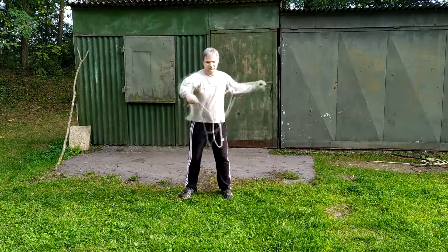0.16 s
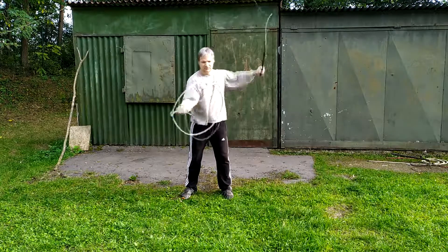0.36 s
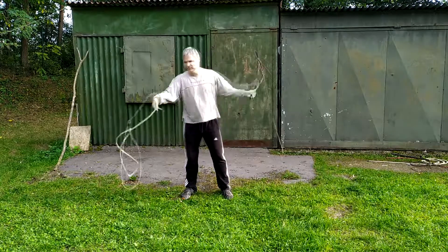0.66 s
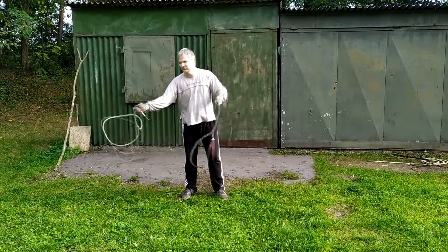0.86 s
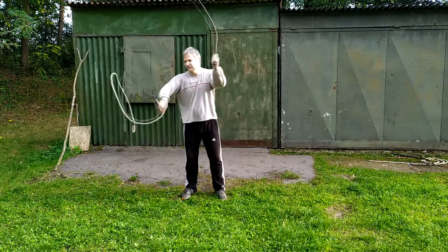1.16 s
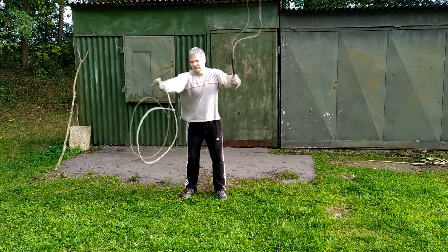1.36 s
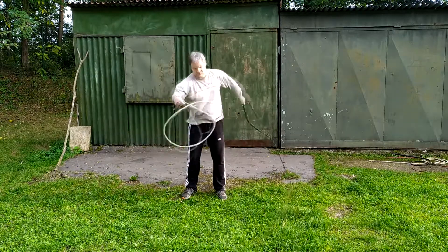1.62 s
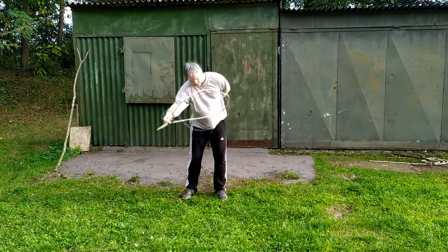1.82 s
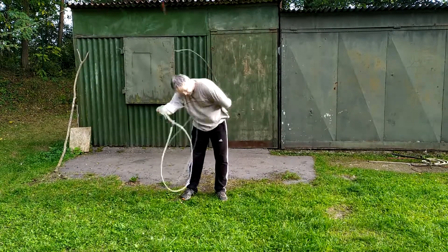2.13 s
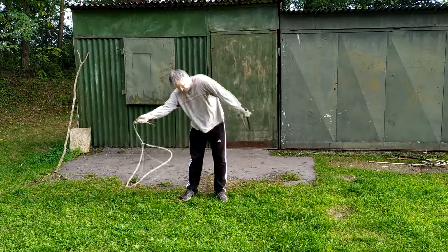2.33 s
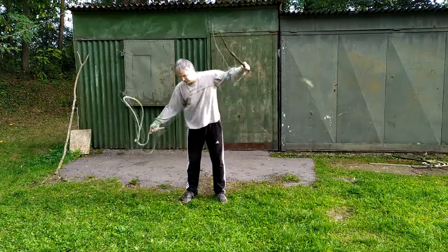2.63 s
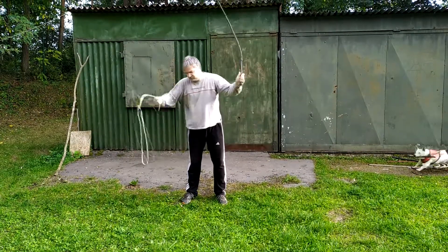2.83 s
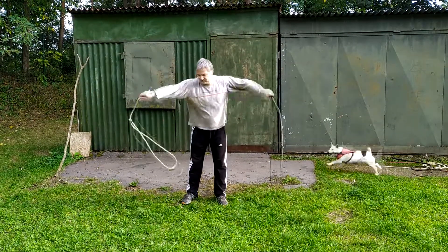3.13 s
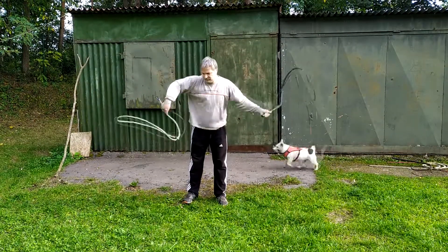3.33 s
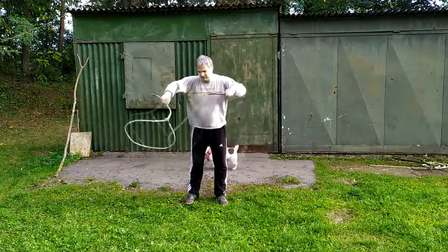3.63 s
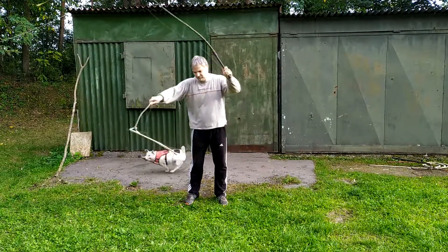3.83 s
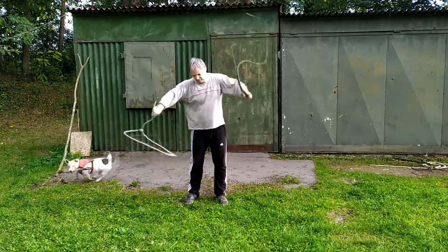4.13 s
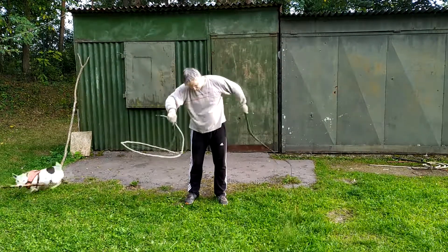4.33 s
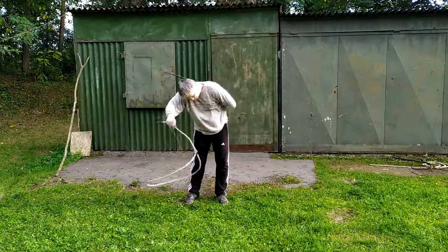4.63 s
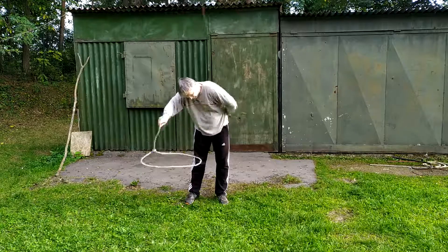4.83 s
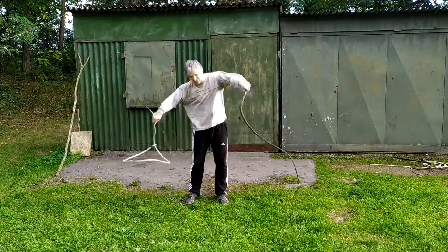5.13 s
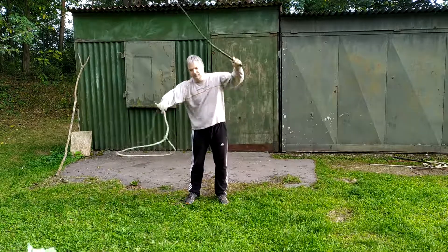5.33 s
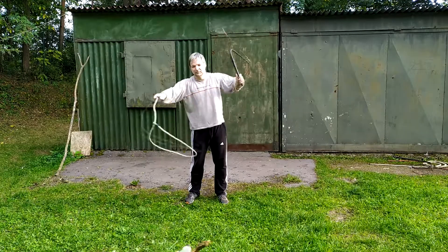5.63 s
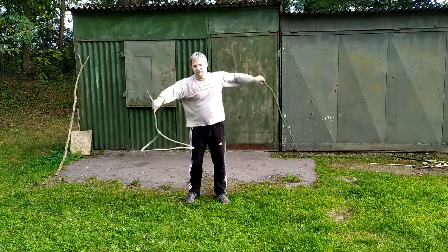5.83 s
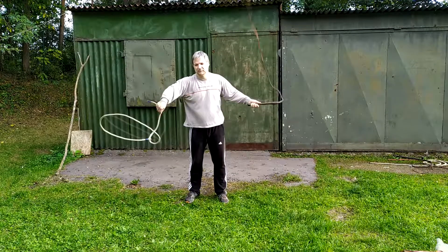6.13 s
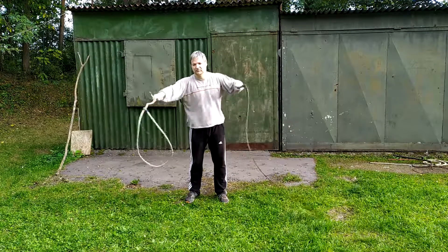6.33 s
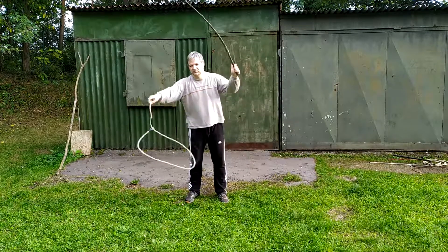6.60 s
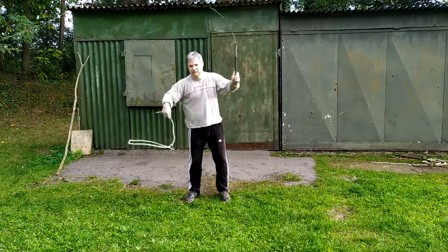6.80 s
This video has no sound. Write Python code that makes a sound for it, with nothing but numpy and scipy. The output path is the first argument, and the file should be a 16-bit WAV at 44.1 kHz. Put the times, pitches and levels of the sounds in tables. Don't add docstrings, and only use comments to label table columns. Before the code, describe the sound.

A bullwhip is swung on a lawn by a metal shed among trees, heard in close stereo. At 0 s a violent crack, the strongest, bursts in already at full force, overloading the microphones with a thump and momentary deafness; a shed echo and bright leafy tail follow. Soft rushes, a falling whistle, then a cluster of hard ticks and dull grass slaps come around 0.75-0.92 s. Cracks return at 1.54, a tight double at 2.44, then 3.17 and 3.43, a strong one at 4.28, another tight double at 5.06, and 5.84 and 6.14 s. Short rising swishes with tip hiss precede many. Each crack is instant, broadband and only milliseconds long, with diffuse tree echoes decaying behind. Fuzzy whistles and low slaps fill the gaps, notably near 2.0, 2.6, 3.65, 4.5 and 5.2 s. Faint breeze, rumble and leaf hiss continue to about 7 s.

```python
import sys
import numpy as np
from scipy import signal
from scipy.fft import rfft, irfft
from scipy.io import wavfile
from scipy.ndimage import uniform_filter1d

SR = 44100
rng = np.random.default_rng(int(sys.argv[2]) if len(sys.argv) > 2 else 0)


def pcm_store(signal):
    levels = np.round(np.clip(np.atleast_2d(signal), -1, 1) * 32767)
    wavfile.write(sys.argv[1], SR, levels.astype(np.int16).T)


def ratio(d):
    e = np.asarray(d, float) / 20
    return 10 ** e


N = 306926

# t/s, shock level/dB, shock length/ms, left-right level/dB, shed echo delay/ms
CRACKS = [(-.001, 15.5, 3, 3, 28), (1.5428, -2, 7.6, 7, 28), (2.4341, -16.5, 10, 0, 3.4),
          (2.4421, -4, 5.6, 0, 26), (3.1699, -1, 4.4, 9, 21.2), (3.428, -4.5, 6.5, 0.5, 23),
          (4.2809, 4, 3.8, 0.5, 32), (5.0609, -3.5, 2, 2.5, 25), (5.0701, -3.5, 7, 1.5, 19),
          (5.842, -1, 4, -4, 24), (6.14, -4, 8.1, 2.5, 25)]
# shed level/dB, near trees level/dB, far trees level/dB, brightness/(dB per octave)
RETURNS = [(-14.5, -7.5, -22.5, -3), (-17.5, -7.5, -28, -2.5), (-15.5, -36, -49, -1),
           (-31, -11.5, -25.5, -0.36), (-15, -11, -28.5, -1.75), (-18, -15, -24.5, -1.56),
           (-16, -7.5, -25, -3), (-35, -10.5, -33.5, -0.5), (-42.5, -9.5, -23.5, -1),
           (-18, -10.5, -26.5, -1.53), (-25.5, -18.5, -22.5, 0)]


def evened(x):
    return x / np.sqrt(np.mean(x ** 2) + 1e-20)


def read(points, hz):
    f, value = np.transpose(points)
    return np.interp(np.log(hz + 1), np.log(f + 1), value)


def add(mix, s, sound, pan_db=0.):
    at = round(s * SR)
    sound = (sound * ratio(np.array([[.5], [-.5]]) * pan_db))[:, max(-at, 0):]
    part = mix[:, max(at, 0):][:, :sound.shape[1]]
    part += sound[:, :part.shape[1]]


def resonate(x, hz, width):
    turn = np.exp(2j * np.pi * np.cumsum(hz) / SR)
    r = np.exp(-np.pi * width / SR)
    return 2 * (turn * signal.lfilter([(1 - r) ** 2], [1, -2 * r, r * r], x / turn)).real


def smoothed(x, bins, frames):
    return evened(uniform_filter1d(uniform_filter1d(x, size=bins, axis=0), size=frames, axis=1))


def air():
    # f/Hz, level/(dB per Hz)
    spectrum = [(18, -38), (30, -3), (79, -3), (138, -15.5), (303, -10.5), (554, -18.5), (632, -20.5),
                (1100, -18.5), (2350, -24), (5450, -23.5), (9970, -17.5), (16000, -24.5)]
    # f/Hz, left-right likeness/1
    likeness = [(60, 0.9), (240, 1), (950, 0.77), (3770, -0.23), (15000, -0.38)]
    # t/s, breeze on the lawn level/dB, wind in the tree tops level/dB
    breeze = [(0, -4.5, 1.5), (.5, -1.5, 0.5), (.9, 3, 5.5), (1.26, -3.5, 3.5), (1.5, 3, 1),
              (2.001, 3, -3.5), (2.3, -1.5, -3.5), (2.45, 8, 1), (2.8, -5, -4.5), (3.1, 4, -3), (3.7, 6, 3),
              (3.86, -4, 1), (4.5, 3, 2), (4.901, 2.5, -2.5), (5.5, 1, 0.5), (5.8, 6.5, 2.5),
              (6.55, 0.5, 8), (6.96, 1.5, 6)]
    per_wind = [0.081, 0.042, .25, 0.98]
    # gain per dB of lawn breeze, gain for a full stir/dB, base level/dB
    per_breeze, per_stir_db, base_db = [.7, 1.2, 0.4, 0], [7, 7, 0.5, 6], [2.5, 1.5, 2, -4.5]
    level_db, patchy_db, stir_s = -55, 3.5, 0.8

    frames, hz = N // 256 + 5, np.fft.rfftfreq(1024, 1 / SR)[:, None]
    a, b, c, d, patches = rng.standard_normal((frames, 513, 5)).T
    patches = smoothed(patches, 10, 10)
    t = (np.arange(frames) * 256 - 512) / SR

    age = t - np.transpose(CRACKS)[:1].T
    stir = (np.exp(-np.maximum(age, 0) / stir_s) * (age > 0)).max(axis=0)
    s, lawn_db, tops_db = np.transpose(breeze)
    wind_db = np.outer(per_breeze, np.interp(t, s, lawn_db))
    wind_db += np.outer(per_wind, np.interp(t, s, tops_db))
    rumble_db, grass_db, leaf_db, fizz_db = wind_db + np.outer(per_stir_db, stir) + np.c_[base_db]

    low = 1 / (1 + (hz / 170) ** 4)
    high = 1 / (1 + (1500 / (hz + 1)) ** 2)
    swell_db = low * rumble_db + (1 - low - high) * grass_db + high * leaf_db
    swell_db += fizz_db / (1 + (9300 / (hz + 1)) ** 10)

    same = np.clip(read(likeness, hz), -1, 1)
    left = a + 1j * b
    right = same * left + np.sqrt(1 - same ** 2) * (c + 1j * d)
    patch_db = patchy_db * (1 - low - 0.2 * high) * patches
    z = np.array([left, right]) * evened(ratio(read(spectrum, hz))) * ratio(swell_db + patch_db)
    return ratio(level_db + 27.5) * signal.istft(z, nperseg=1024, noverlap=768)[1][:, :N] / 1024


def slaps():
    # t/s, peak level/dB, f/Hz, t60/s, left-right level/dB
    blows = [(0.265, -39.5, 150, 0.045, -3), (0.587, -42, 746, 0.051, 0.0), (0.8078, -30, 330, 0.029, -1),
             (0.8182, -36, 783, 0.031, -1), (0.896, -40.5, 770, 0.14, -2), (0.924, -35.5, 328, 0.039, -3),
             (1.814, -37.5, 1090, 0.19, 0), (2.021, -40.5, 854, 0.042, 6.5), (2.429, -24.5, 158, 0.024, 0),
             (2.437, -49, 353, 0.031, -1), (2.599, -28, 177, 0.033, -2), (3.653, -29.5, 880, 0.062, 1),
             (3.66, -25.5, 173, 0.011, -1), (3.699, -35.5, 1260, 0.034, 1.5), (4.505, -38, 282, 0.052, 2),
             (4.552, -35, 1170, 0.24, 0.0), (4.599, -45, 339, 0.14, -3), (5.217, -33, 176, 0.076, -2),
             (5.578, -51, 117.7, 0.056, -18), (6.629, -40.5, 170, 0.047, 1)]
    out, t = np.zeros((2, N)), np.arange(4000) / SR
    for s, db, hz, t60, pan_db in blows:
        shared, *own = rng.standard_normal((3, 4000))
        puff = evened(resonate(shared + 0.96 * np.array(own), hz + 0 * t, 0.65 * hz)) + 0.1 * shared
        decay = .7 * ratio(-60 * t / t60) + .5 * np.exp(-t / 0.0057)
        blow = (1 - np.exp(-t / 0.003)) * decay * puff
        add(out, s, ratio(db - 2.5) * blow / abs(blow).max(), pan_db)
    return out


def ticks():
    # t/s, peak level/dB, f/Hz, left-right level/dB
    contacts = [(0.743, -26, 4740, 3), (0.7576, -40, 3440, 0), (0.8084, -26.5, 945, 5),
                (0.8197, -32, 1900, 1), (0.832, -27.5, 9000, -1), (0.8372, -31, 3530, 3.5),
                (0.848, -33, 8900, 6), (0.8995, -24.5, 1520, 1), (0.9172, -34.5, 5300, 5),
                (0.9214, -47, 2500, 8.5), (0.8537, -40, 6960, 3), (5.812, -51, 3600, -4)]
    out, t = np.zeros((2, N)), np.arange(4000) / SR
    for s, db, hz, pan_db in contacts:
        shared, *own = rng.standard_normal((3, 4000))
        snap = evened(resonate(shared + 0.27 * np.array(own), hz + 0 * t, 0.6 * hz)) + .15 * shared
        snap = 0.87 * snap + 1.07 * np.sin(2 * np.pi * hz * t) * np.exp(-t / 0.0018)
        decay = np.exp(-t / 0.00048) + 0.16 * np.exp(-t / 0.0045)
        add(out, s, ratio(db + 0.5) * snap * decay, pan_db)
    return out


def sings():
    # t/s, length/s, low f/Hz, high-to-low ratio/1, level/dB
    pairs = [
        (1.173, 0.12, 808, 1.2, -68.5),
        (2.082, 0.23, 605, 1.528, -70),
    ]
    width, sag_per_s = 0.023, .4
    return [(s, d, k * hz, k * hz * (1 - sag_per_s * 0.011 / d), width, db)
            for s, d, hz, up, db in pairs for k in (1, up)]


def whistles():
    # t/s, length/s, start f/Hz, end f/Hz, level/dB
    passes = [
        (0.547, .119, 905, 600, -55.5),
        (2.018, 0.065, 950, 840, -49.5),
        (2.596, 0.095, 837, 790, -52.5),
        (2.671, 0.079, 690, 753, -51.5),
        (3.595, 0.081, 295, 910, -56.5),
        (4.133, 0.053, 395, 507, -59),
        (4.607, 0.082, 760, 900, -51.5),
        (5.261, 0.073, 660, 476, -53.5),
        (5.314, 0.048, 690, 654, -50.5),
        (5.758, .015, 2240, 2170, -51),
    ]
    return [(s, d, hz0, hz1, 0.12, db) for s, d, hz0, hz1, db in passes]


def rushes():
    # t/s, length/s, f/Hz, level/dB
    loops = [(0.292, 0.079, 970, -47.5), (0.56, 0.063, 1740, -53.5), (2.008, .047, 4530, -51.5),
             (3.085, .092, 9300, -50), (3.329, 0.032, 245, -50), (3.996, 0.066, 1760, -55.5),
             (3.998, .072, 6070, -55.5), (4.797, 0.013, 1500, -57), (4.863, 0.049, 3750, -57),
             (5.208, 0.095, 308, -50.5), (5.639, 0.04, 2000, -55), (5.736, 0.046, 2750, -46),
             (6.303, 0.25, 1070, -59), (6.726, .026, 9100, -54), (0.797, 0.025, 5860, -47.5),
             (0.812, 0.1, 7000, -59), (0.901, 0.052, 5000, -60.5), (6.934, 0.047, 5000, -57.5)]
    width, sag = .9, 0.97
    return [(s, d, hz / np.sqrt(sag), hz * np.sqrt(sag), width, db) for s, d, hz, db in loops]


def run_ups():
    # end t/s, length/s, start f/Hz, top f/Hz, whistle level/dB
    races = [
        (1.554, 0.18, 330, 590, -64),
        (2.449, 0.046, 703, 1026, -39),
        (3.171, 0.059, 330, 910, -65),
        (4.284, .1, 602, 990, -58),
        (5.063, 0.052, 400, 1420, -45.5),
        (5.852, .04, 500, 900, -60),
        (6.143, 0.047, 850, 1140, -53),
    ]
    tip_hiss_db = [
        -51.5,
        -47.5,
        -60,
        -52,
        -54,
        -60,
        -58,
    ]
    width, octave_db, hiss_s, hiss_early_s = .25, -9, .045, .006
    rows = [(end - d, d, hz0, hz1, width, db) for end, d, hz0, hz1, db in races]
    rows += [(s, d, 2 * hz0, 2 * hz1, share, db + octave_db) for s, d, hz0, hz1, share, db in rows]
    rows += [(end - hiss_s - hiss_early_s, hiss_s, 3000, 5000, 1, db)
             for (end, *_), db in zip(races, tip_hiss_db)]
    return rows


def swishes():
    out = np.zeros((2, N))
    for start, length, hz0, hz1, share, db in run_ups() + rushes() + whistles() + sings():
        u = np.arange(0, 1, 1 / (SR * length))
        shared, flutter, *own = rng.standard_normal((4, SR // 4))[:, :len(u)]
        pitch = hz0 * (hz1 / hz0) ** u
        whistle = resonate(shared + 1.3 * np.array(own), pitch, share * (hz0 + hz1) / 2)
        gain = ratio(db + 0.83 * evened(uniform_filter1d(flutter, size=500)))
        add(out, start, gain * evened(whistle) * signal.windows.tukey(len(u), .7))
    return out


def echoes():
    # f/Hz, level/(dB per Hz)
    spectrum = [(88, -57.5), (150, -20.5), (466, -40), (1190, -15), (1340, -23), (2100, -8), (2270, -10),
                (5150, 1), (5680, -2), (10400, -3), (16000, -15)]
    # f/Hz, t60/s
    near_t60 = [(300, 0.15), (1500, 0.38), (3000, 0.35), (6000, 0.27), (10000, 0.29), (15000, 0.2)]
    # f/Hz, t60/s
    far_t60 = [(300, 1.6), (2000, 1.29), (4000, 1.128), (8000, 0.8), (15000, 0.49)]
    swell_peak_db, swell_ms = 2.5, 42.8
    left_db, dense_s = 1.24, 0.039

    taps = rng.standard_normal((2, N)) * ratio(1.8 * np.minimum(rng.exponential(1, (2, N)), 4))
    hz, t, z = signal.stft(taps, SR, nperseg=128, noverlap=96)
    near, far = read(near_t60, hz)[:, None], read(far_t60, hz)[:, None]
    octaves = np.log2(np.maximum(hz, 500)[:, None] / 4500)
    lean = ratio(np.array([1, -1]) * left_db)[:, None, None]
    power = np.zeros(z.shape)
    for (s, *_), (_, near_db, far_db, tilt_db) in zip(CRACKS, RETURNS):
        age = np.maximum(t - s - .002, 0)
        swell_db = swell_peak_db * np.exp(-((age * 1000 - swell_ms) / 13) ** 2)
        late = np.hypot(age, dense_s) - dense_s
        tail = ratio(2 * (near_db + swell_db) - 120 * late / near) * (1 - 0.62 * np.exp(-age / .012))
        tail += ratio(2 * far_db - 120 * age / far) * (1 - np.exp(-age / 0.19))
        power += lean * tail * ratio(2 * tilt_db * octaves) * (age > 0)

    a, b = rng.standard_normal((*z.shape[:0:-1], 2)).T
    clumps = smoothed(a, 24, 8)
    blobs = smoothed(b, 2, 30)
    colour = evened(ratio(read(spectrum, hz)))[:, None] * ratio(1.8 * clumps + 2.1 * blobs)
    leaves = signal.istft(z * colour * np.sqrt(power), SR, nperseg=128, noverlap=96)[1]
    return leaves[:, :N] / taps.std()


def shocks():
    # f/Hz, level/(dB per Hz)
    spectrum = [(120, -37), (200, -10.5), (1530, -14.5), (2700, -11.5), (3830, -7), (6520, -11.5),
                (9930, -13), (14900, -20.5), (16000, -39.5)]
    out, t = np.zeros((2, N)), np.arange(-300, 1748) / SR
    colour = ratio(read(spectrum, np.fft.rfftfreq(2048, 1 / SR)))
    after = np.maximum(t, 0)
    rush = .09 * np.exp(np.minimum(t, 0) / .0016) * (t < .0004)
    ribs = (1 - np.exp(-after / .0004)) * (1.3 * np.exp(-after / .0013) + np.exp(-after / .012))
    for (s, db, ms, pan_db, shed_ms), (shed_db, *_) in zip(CRACKS, RETURNS):
        front, back = evened(irfft(rfft(rng.standard_normal((2, 2, 2048))) * colour))
        shape = (1 - np.exp(-after / 0.000041)) / (1 + (after * 1000 / ms) ** 18.0)
        add(out, s + t[0], ratio(db) * front * (rush + shape), pan_db)
        add(out, s + t[0] + shed_ms / 1000, ratio(shed_db) * back * ribs, pan_db / 2)
    return out


def scene():
    return air() + slaps() + ticks() + swishes() + echoes() + shocks()


def stunned():
    # t/s, signed bias push/1, deaf time/ms
    stuns = [
        [(-.002, 9.0, 20), (1.543, -.45, 15), (2.432, .08, 14), (3.1715, -1.9, 19), (3.4315, -.3, 14),
         (4.284, .4, 15), (5.8447, -1.6, 17)],
        [(-.003, 9.0, 21), (1.5428, 3.6, 17), (2.432, .08, 14), (3.1708, 1.9, 19.5), (3.4285, .7, 20),
         (4.2812, -5.0, 17), (5.8422, 4.5, 19), (6.142, 3.6, 15)],
    ]
    bias, thump, t = np.zeros((2, N)), np.zeros((2, N)), np.arange(4000) / SR
    for side, rows in zip(np.eye(2)[:, :, None], stuns):
        for s, push, ms in rows:
            creep = .55 + .45 * np.sin(np.minimum(t * 1000 / ms, 1) * 2.6) ** 2
            held = creep * (1 - np.exp(-(t / .0013) ** 2)) / (1 + np.exp((t * 1000 - ms) / 1.8))
            add(bias, s, side * push * held)
            step = (1 - np.exp(-t / .0006)) / (1 + np.exp((t * 1000 - ms) / 3.2))
            add(thump, s, side * ratio(-2.5) * np.tanh(1.2 * push) * step)
    return bias, thump


def low_pass(x):
    return signal.sosfilt(signal.butter(12, 16420, fs=SR, output="sos"), x)


def record(dry):
    bias, thump = stunned()
    heard = 1.058 * np.tanh(0.93 * (np.tanh(dry / 0.87 + bias) - np.tanh(bias)) / 0.87)
    low_cut = signal.cheby1(4, 1.5, 50, "high", fs=SR, output="sos")
    band = signal.firwin(255, 16000, window=("kaiser", 8), fs=SR)
    heard = signal.oaconvolve(signal.sosfilt(low_cut, heard + thump), band[None], "same")
    return low_pass(np.clip(heard, -1, 1))


dry = scene()
out = record(dry)
pcm_store(out)
```